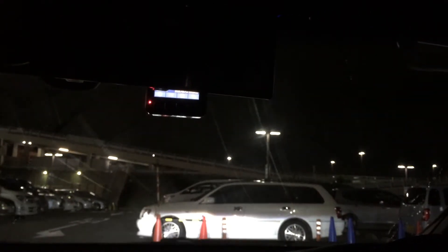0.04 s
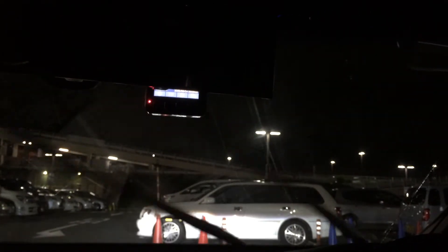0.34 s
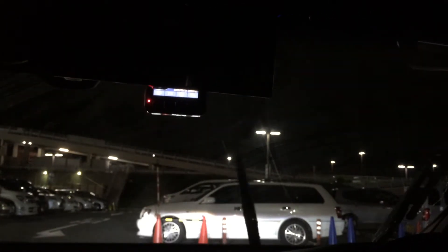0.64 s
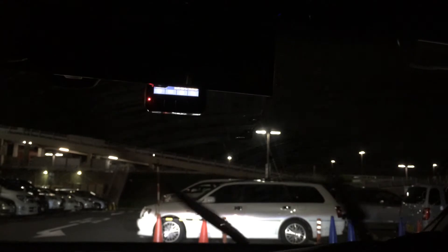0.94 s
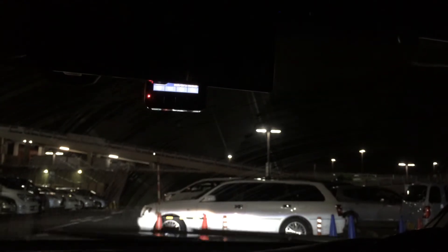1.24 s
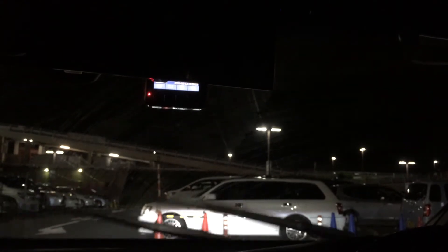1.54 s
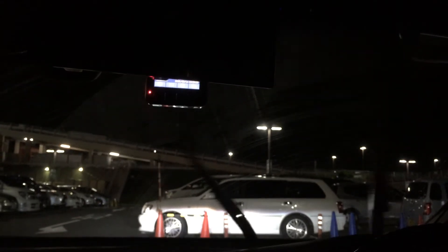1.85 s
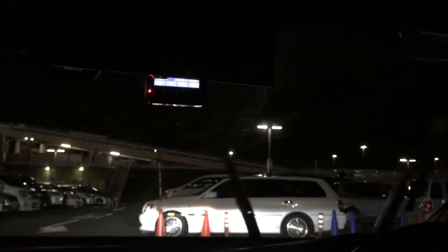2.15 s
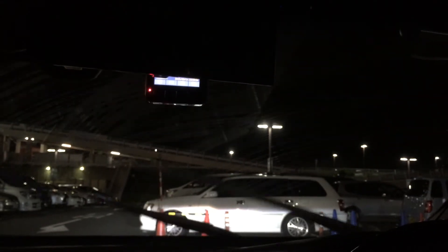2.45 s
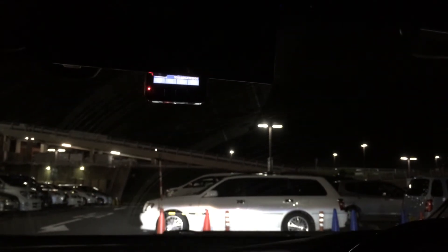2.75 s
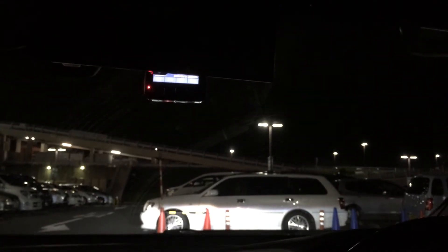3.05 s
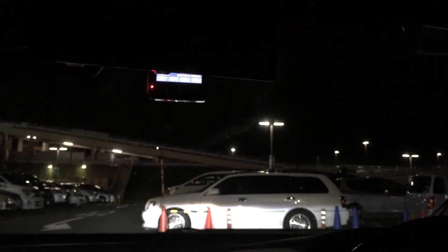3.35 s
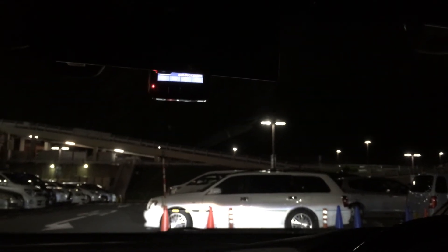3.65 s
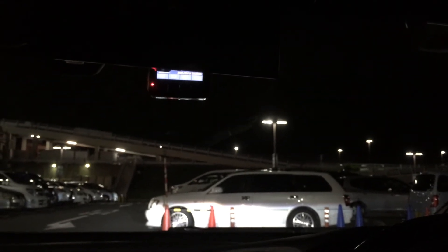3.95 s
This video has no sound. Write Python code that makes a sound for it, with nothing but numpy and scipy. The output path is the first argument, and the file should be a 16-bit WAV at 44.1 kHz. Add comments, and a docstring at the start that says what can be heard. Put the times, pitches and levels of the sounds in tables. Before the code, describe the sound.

Windshield wipers sweep back and forth twice, heard from inside a parked car. The blades flip with a click and a dull thump at about 0.2, 0.9, 1.5 and 2.2 seconds, then park with a softer thud at 2.8. A low engine hum and vent fan run throughout, while a very faint high electrical whine comes and goes. A brief soft rustle follows around 3.7 seconds.

```python
"""Wipers in an idling car

Inside a parked car the engine hums and the vent fan blows while the wipers make two sweeps and park.
At each turn the blades flip over with a click and the linkage thumps the body, exciting damped modes;
in between, the rubber hisses faintly on the glass. A thin electrical whine comes and goes,
and something rustles briefly at the start and again near the end."""
import sys
import numpy as np
from scipy import signal
from scipy.fft import rfft, irfft
from scipy.io import wavfile
from scipy.ndimage import uniform_filter1d

SR = 44100
rng = np.random.default_rng(int(sys.argv[2]) if len(sys.argv) > 2 else 0)


def wav_out(sig):
    """Save sig, one row per channel (or a flat mono array), as 16-bit PCM at SR to the path in sys.argv[1]."""
    wavfile.write(sys.argv[1], SR, np.round(np.clip(np.atleast_2d(sig).T, -1, 1) * 32767).astype(np.int16))


N = 176400
T = np.arange(N) / SR

# engine harmonics: (multiple of the crank rate, rms level [dB])
ENGINE_ORDERS = [(2, -58.5), (3, -40.5), (4, -50), (5, -63), (6, -60.5), (7, -57), (8, -54.5), (9, -50),
                 (10, -59.5), (12, -63), (15, -69.5), (16, -66.5)]
# vent air over cabin rumble: (frequency [Hz], spectral density [dB per Hz])
AIR_SPECTRUM = [(15, -90), (30, -80), (52, -72), (68, -72.5), (85, -68.5), (120, -70.5), (200, -79),
                (300, -87), (420, -90), (520, -93.5), (1000, -95.5), (1900, -98), (2500, -104),
                (3500, -110), (6000, -113), (10000, -118), (15000, -121)]
# duct resonances: (frequency [Hz], width [Hz], lift [dB])
DUCT_RESONANCES = [(669, 83, 10), (929, 53, 6.5), (3536, 110, 5.5), (4518, 300, 9.5), (5180, 240, 5.5),
                   (6430, 650, 4)]
# tones of the fan and belt drive: (frequency [Hz], rms level [dB])
FAN_TONES = [(248, -77.5), (283, -68), (319, -74), (388, -67.5), (485, -71.5), (577, -72.5), (598, -73),
             (657, -77), (682, -71), (719, -73), (898, -77), (920, -73), (1017, -77), (1319, -79),
             (1443, -88), (1550, -77.5), (1927, -80)]
# spans in which the whine sounds: (start [s], end [s])
WHINE_ON = [(-.5, .058), (1.046, 2.04), (3.032, 4.5)]
# partials of the whine: (harmonic number, rms level [dB])
WHINE_PARTIALS = [(8, -86), (16, -88), (18, -88), (19, -86), (20, -76), (21, -87), (22, -97), (23, -97),
                  (28, -98), (35, -94), (36, -94), (37, -95), (38, -97), (39, -98), (41, -93), (42, -96),
                  (43, -96), (44, -92), (45, -88)]
# hiss of the whine: (frequency [Hz], spectral density [dB per Hz])
WHINE_HISS_SPECTRUM = [(4000, -135), (6200, -116), (6800, -108), (7400, -116), (9000, -124), (11000, -132),
                       (12000, -122), (14000, -124), (15200, -116)]
# swells of rustling: (time [s], level [dB], rise [s], t60 [s])
RUSTLE_SWELLS = [(.020, -65, 0.026, .2), (3.654, -62, 0.0077, .15), (3.690, -56.5, .003, 0.076),
                 (3.732, -66.5, 0.025, 0.36), (3.785, -72, .03, 0.21)]
# colour of the rustling: (frequency [Hz], relative density [dB])
RUSTLE_SPECTRUM = [(500, -19), (1500, 3), (3000, -4), (5500, 0.5), (8000, -1), (11000, -5.5), (15000, -7)]
# pushes of the linkage on the body: (time [s], impulse [dB], duration [s])
LINKAGE_PUSHES = [(0.157, -9, 0.0018), (0.171, -9, 0.0031), (0.8736, 1, 0.0023), (1.483, -4.5, 0.0032),
                  (1.511, -11, 0.0014), (2.2217, -1, 0.0035), (2.848, -15, 0.0028)]
# heavily damped body modes: (frequency [Hz], gain [dB], t60 [s])
BODY_MODES = [(66.5, -24.5, 0.048), (106, -26.5, 0.091), (141, -31.5, 0.16), (189, -32.5, 0.075),
              (227, -35.5, 0.029), (325, -31, 0.043)]
# boom at each turn: (time [s], deep mode [dB], middle mode [dB], upper mode [dB])
CABIN_BOOMS = [(.185, -29.5, -33, -30.5), (.874, -27, -26.5, -30), (1.509, -23.5, -43, -35.5),
               (2.2223, -29, -25, -26.5), (2.832, -34, -37, -44)]
# those modes of cabin air and panels: (frequency [Hz], delay [s], rise [s], t60 [s])
CABIN_MODES = [(63.2, 0.045, 0.028, 0.23), (106.9, 0.0212, .007, .30), (175.8, 0.017, 0.007, .11)]
# blade reversals: (time [s], level [dB], rise [s], treble [dB], arm blow [dB], blade blow [dB])
BLADE_FLIPS = [(0.184, -43.5, 0.0058, 1.5, -13, 0.5), (0.8762, -38.5, 0.0032, -0.5, 1.5, -11),
               (1.5130, -44, 0.011, -12, -41, -3.5), (2.2255, -35.5, 0.00057, -0.5, -2.5, -9)]
# colour and decay of a flip: (frequency [Hz], relative density [dB], t60 [s])
FLIP_SPECTRUM = [(247, 4, 0.062), (456, -1.5, 0.13), (680, -6, 0.062), (1300, -12.5, 0.06),
                 (1650, -9, 0.09), (2130, -8.5, 0.08), (3040, -16.5, 0.035), (5260, -23, 0.048),
                 (6900, -26, 0.043), (11000, -35, .04), (15000, -38, .04)]
# wiper arm modes: (frequency [Hz], gain [dB], t60 [s])
ARM_MODES = [(393.4, -38, .08), (602, -41.5, 0.056), (688, -39, 0.043), (1030, -35, 0.048),
             (1177, -36.5, 0.047), (1530, -39, 0.026), (2067, -46, 0.024), (2356, -45.5, .03)]
# blade modes: (frequency [Hz], gain [dB], t60 [s])
BLADE_MODES = [(321.4, -39, 0.14), (1998, -52, 0.035), (3416, -47.5, 0.026)]
# the arms start, turn or stop: (time [s])
STROKE_ENDS = [.18, .876, 1.51, 2.224, 2.84]
# ticks of rubber on glass: (time [s], level [dB], centre frequency [Hz])
RUBBER_TICKS = [(.380, -76, 12500), (0.596, -67, 9300), (.622, -71, 8500), (1.025, -73, 11000),
                (2.101, -63, 6030), (2.112, -69, 7440), (2.385, -71, 11000), (2.710, -75, 10000)]
# snaps of the blade joints: (time [s], level [dB])
JOINT_SNAPS = [(0.875, -40), (0.8766, -33), (0.878, -63), (2.2248, -44), (2.2263, -45), (2.2295, -47)]


def from_db(db):
    """Amplitude ratio of a level in decibels."""
    return 10 ** (np.asarray(db) / 20)


def rms_one(x):
    """Normalisation to unit rms."""
    return x / np.sqrt(np.mean(x ** 2) + 1e-20)


def at_hz(points, hz, axis=1):
    """Interpolation of a table column over log frequency."""
    points = np.array(points)
    return np.interp(np.log(np.maximum(hz, 1)), np.log(points[:, 0]), points[:, axis])


def drift(rate):
    """Random modulation: noise of unit rms, low-passed at rate [Hz]."""
    r = np.exp(-80 * np.pi * rate / SR)
    slow = signal.lfilter([1], [1, -2 * r, r * r], rng.standard_normal(N // 40 + 2002))[2000:]
    return np.interp(np.arange(N) / 40, np.arange(len(slow)), rms_one(slow))


def band_noise(low_hz, high_hz):
    """Band-limited noise of unit rms."""
    sos = signal.butter(3, [low_hz, min(high_hz, SR / 2 - 1)], "band", fs=SR, output="sos")
    return rms_one(signal.sosfilt(sos, rng.standard_normal(N)))


def coloured_noise(points, bumps=()):
    """Noise of a given spectral density, with resonance peaks."""
    hz = np.arange(N // 2 + 1) * SR / N
    peaks_db = sum(lift / (1 + (2 * (hz - centre) / width) ** 2) for centre, width, lift in bumps)
    gain = from_db(at_hz(points, hz) + peaks_db)
    return irfft(rfft(rng.standard_normal(N)) * gain, N) * np.sqrt(SR / 2)


def swell(s, rise, t60):
    """Exponential growth to 1 at time s, then exponential decay."""
    return np.exp(np.maximum(np.minimum((T - s) / rise, (s - T) * np.log(1000) / t60), -40))


def ring(force, modes):
    """Modal response: a force drives a sum of damped oscillators."""
    out = 0
    for hz, db, t60 in modes:
        r, w = np.exp(-np.log(1000) / (t60 * SR)), 2 * np.pi * hz / SR
        out += from_db(db) * signal.lfilter([0, np.sin(w)], [1, -2 * r * np.cos(w), r * r], force + 1e-18)
    return out


def engine(crank_hz=13.29, wander=0.003, firings_per_turn=3):
    """Harmonics of the crank rate: uneven firings modulate the hum once a turn."""
    turns = np.cumsum(crank_hz * (1 + wander * drift(0.92))) / SR
    hum = 0
    for order, db in ENGINE_ORDERS:
        sway_db = 2 if order == firings_per_turn else 0.5
        level = from_db(db + sway_db * drift(1.85))
        hum += level * np.cos(2 * np.pi * (order * turns + rng.random()))
    return np.sqrt(2) * hum


def ventilation(flutter_db=0.4, tone_width_hz=2.55):
    """Flow noise shaped by duct resonances; random modulation makes the fan tones waver."""
    air = coloured_noise(AIR_SPECTRUM, DUCT_RESONANCES) * from_db(flutter_db * drift(rate=30))
    for hz, db in FAN_TONES:
        phase = 2 * np.pi * hz * T
        tone = drift(tone_width_hz) * np.cos(phase) + drift(tone_width_hz) * np.sin(phase)
        air += from_db(db) * tone
    return air


def electrical_whine(fundamental_hz=337.8, jitter=0.00105):
    """High harmonics of one unsteady fundamental, gated on and off with a trace of hiss."""
    gate = sum(1.0 * ((T > start) & (T < end)) for start, end in WHINE_ON)
    cycles = np.cumsum(fundamental_hz * (1 + jitter * drift(rate=48))) / SR
    buzz = sum(from_db(db) * np.sin(2 * np.pi * (k * cycles + rng.random())) for k, db in WHINE_PARTIALS)
    return uniform_filter1d(gate, size=128) * (np.sqrt(2) * buzz + coloured_noise(WHINE_HISS_SPECTRUM))


def rustle(grain_db=0.5):
    """Short swells of noise, given a slight grain by fast amplitude modulation."""
    envelope = sum(from_db(db) * swell(s, rise, t60) for s, db, rise, t60 in RUSTLE_SWELLS)
    return envelope * rms_one(coloured_noise(RUSTLE_SPECTRUM) * from_db(grain_db * drift(rate=150)))


def linkage_thumps(radiates_above_hz=38):
    """Force pulses excite the body (the longer, the duller); the boom sinks from panels to cabin air."""
    force, boom = np.zeros(N), 0
    for s, db, duration in LINKAGE_PUSHES:
        push = np.sin(np.pi * np.clip((T - s) / duration, 0, 1)) ** 2
        force += from_db(db) * push / push.sum()
    for s, *levels in CABIN_BOOMS:
        for db, (hz, delay, rise, t60) in zip(levels, CABIN_MODES):
            boom += from_db(db) * swell(s + delay, rise, t60) * np.cos(2 * np.pi * hz * (T - s))
    radiation = signal.butter(2, radiates_above_hz, "high", fs=SR, output="sos")
    return boom + signal.sosfilt(radiation, ring(force, BODY_MODES))


def blade_flips():
    """Impact excitation: the rubber edge rolls over in a noise burst, and arm and blade ring freely."""
    edges = np.geomspace(220, 16000, 14)
    centres = np.sqrt(edges[1:] * edges[:-1])
    shares = from_db(at_hz(FLIP_SPECTRUM, centres)) * np.sqrt(np.diff(edges))
    shares /= np.sqrt(np.sum(shares ** 2))  # band powers sum to 1
    crackle = np.zeros(N)
    for low, high, hz, share in zip(edges, edges[1:], centres, shares):
        treble_weight = at_hz([(2000, 0), (7000, 1)], hz)
        t60 = at_hz(FLIP_SPECTRUM, hz, axis=2)
        envelope = sum(from_db(db + treble_weight * treble_db) * swell(s, rise, t60)
                       for s, db, rise, treble_db, _, _ in BLADE_FLIPS)
        crackle += share * envelope * band_noise(low, high)
    blows = np.zeros((2, N))
    for s, *_, arm_db, blade_db in BLADE_FLIPS:
        blows[:, int(s * SR)] = from_db([arm_db, blade_db])
    return crackle + ring(blows[0], ARM_MODES) + ring(blows[1], BLADE_MODES)


def wiping(hiss_db=-82, tick_spread=1.25):
    """Friction noise of rubber on glass grows with sliding speed; faint ticks dot the strokes."""
    strokes = np.interp(T, STROKE_ENDS, np.arange(len(STROKE_ENDS)))
    speed = np.abs(np.sin(np.pi * strokes))
    ticks = 0
    for s, db, hz in RUBBER_TICKS:
        envelope = from_db(db) * swell(s, rise=0.0012, t60=0.035)
        ticks += envelope * band_noise(hz / tick_spread, hz * tick_spread)
    return ticks + from_db(hiss_db) * speed * band_noise(4400, 12000)


def joint_snaps(tail_db=-15.5):
    """Bright transients of the blade joints: direct sound, then a weak tail of cabin reflections."""
    envelope = 0
    for s, db in JOINT_SNAPS:
        direct = swell(s, rise=0.0001, t60=0.0012)
        tail = from_db(tail_db) * swell(s, rise=0.0002, t60=0.038)
        envelope += from_db(db) * (direct + tail)
    return envelope * band_noise(5800, 8200)


def scene():
    """Superposition of all sources at the front seat."""
    wipers = blade_flips() + joint_snaps() + linkage_thumps() + wiping()
    return (wipers + engine() + ventilation() + electrical_whine() + rustle())[None]


def record(dry):
    """Band limiting: a steep low-pass removes the highest treble."""
    cutoff_hz = 15350
    return signal.sosfilt(signal.ellip(12, 0.1, 90, cutoff_hz, fs=SR, output="sos"), dry)


dry = scene()
out = record(dry)
wav_out(out)
```